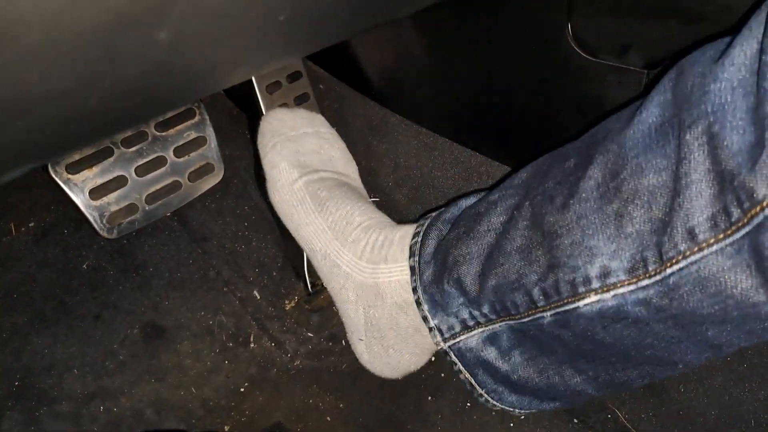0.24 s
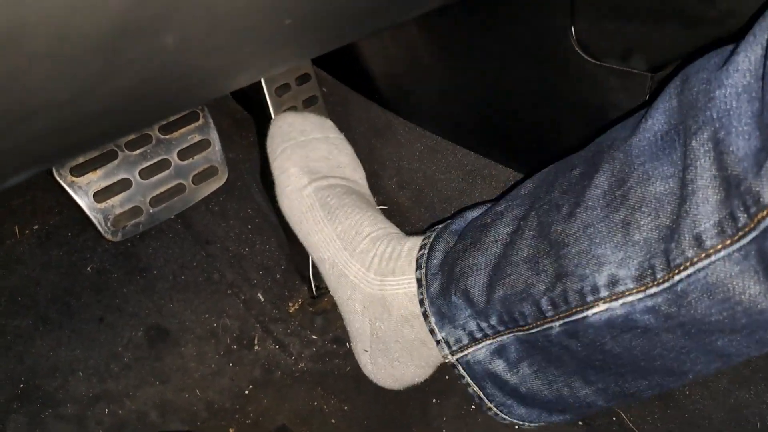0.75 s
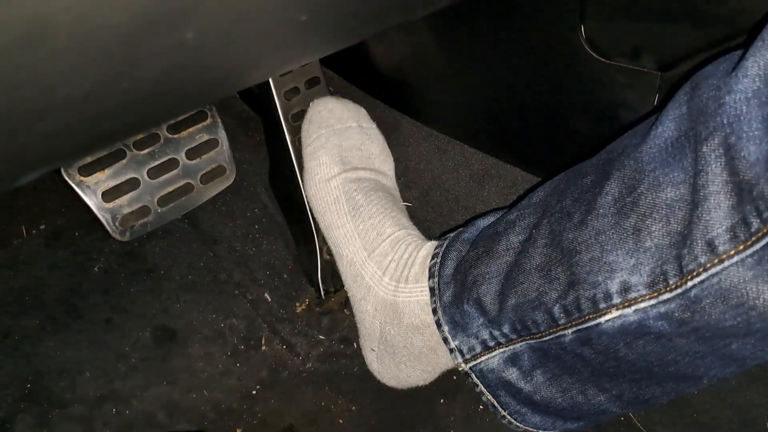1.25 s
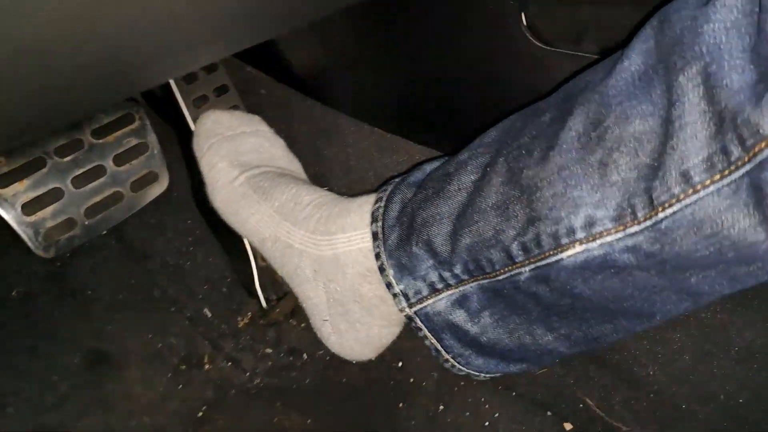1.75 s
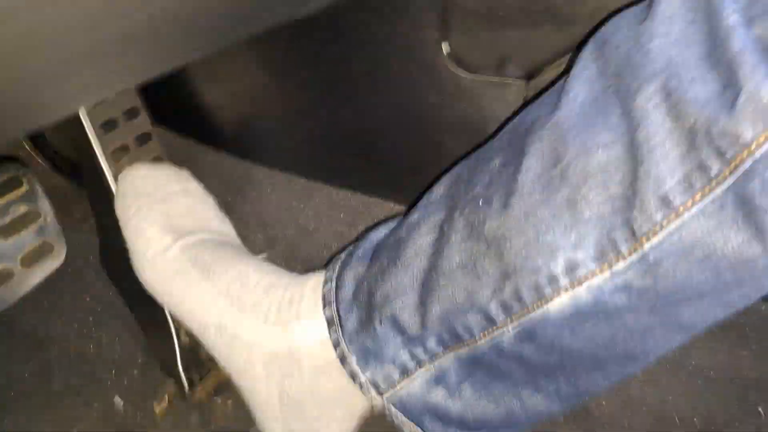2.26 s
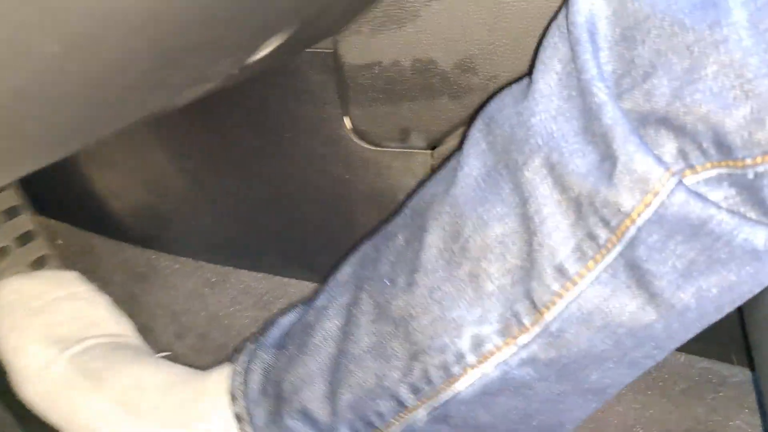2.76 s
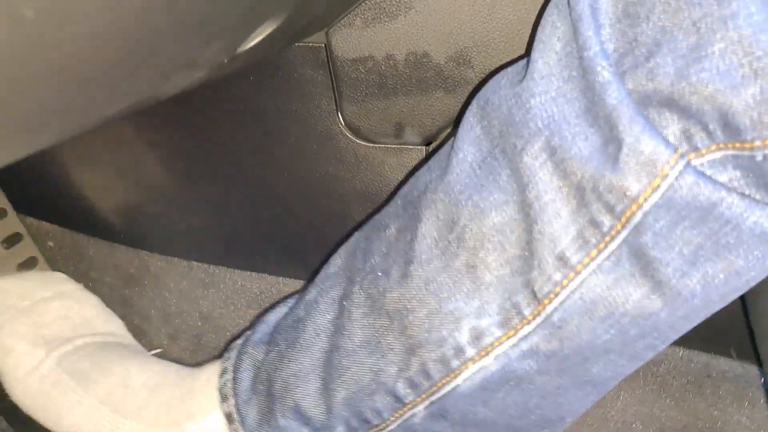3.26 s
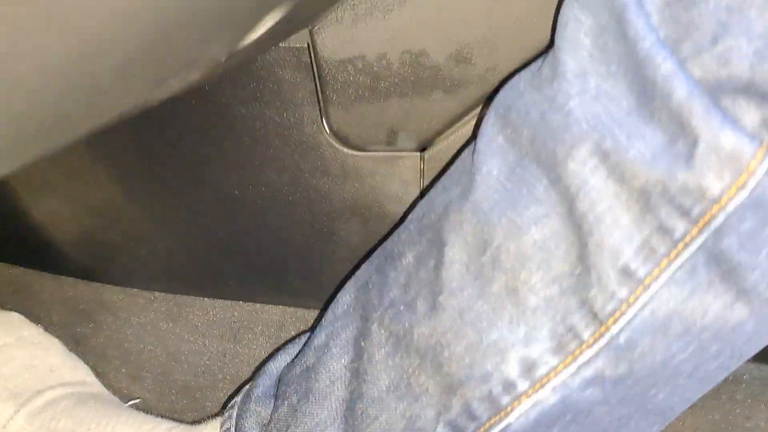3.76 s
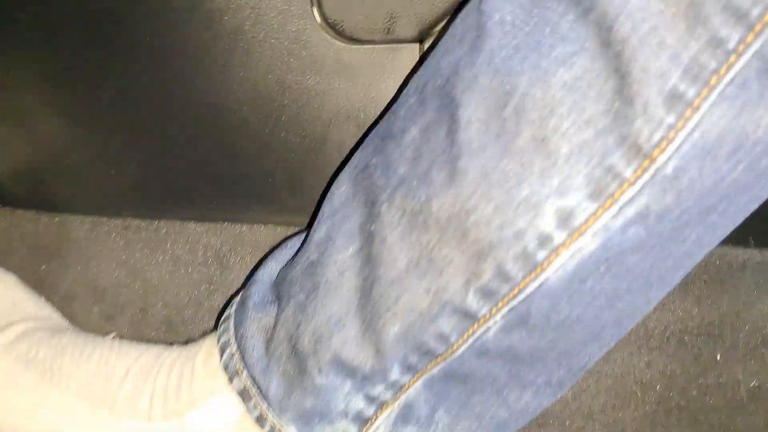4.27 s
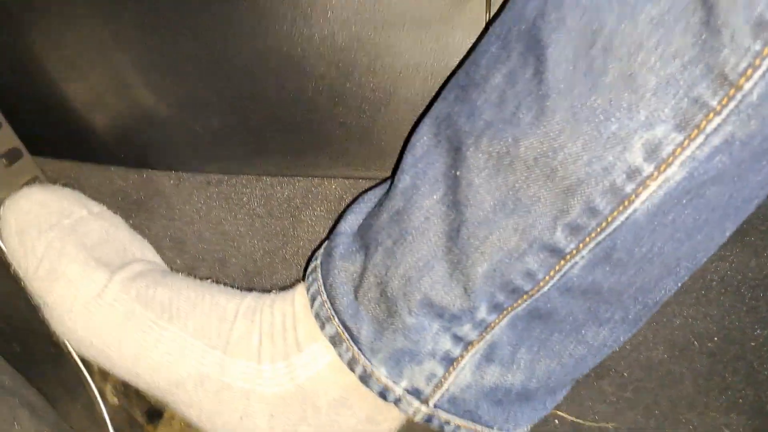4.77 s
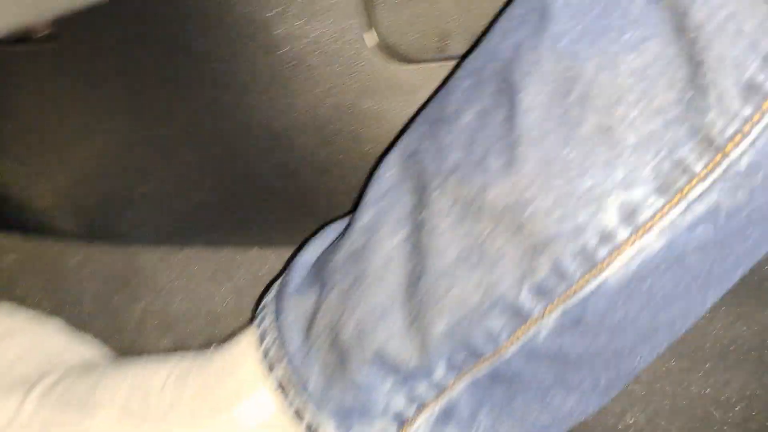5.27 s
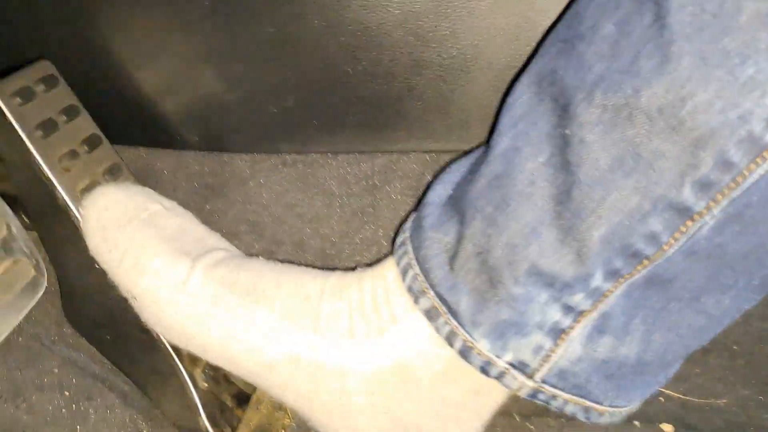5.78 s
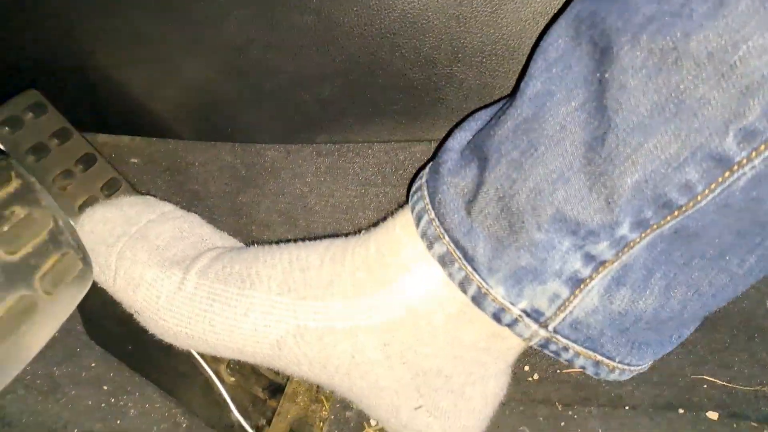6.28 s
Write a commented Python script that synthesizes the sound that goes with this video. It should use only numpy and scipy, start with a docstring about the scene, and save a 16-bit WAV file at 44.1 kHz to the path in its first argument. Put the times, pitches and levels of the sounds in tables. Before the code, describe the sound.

Faint, irregular brushing and a few soft taps come from a foot in a sock working the pedals of a parked car. Handling noise on the nearby hand-held microphone soon adds clicks, scrapes and fabric swishes. The loudest knock lands about halfway, followed by a short stuttering creak, then busier rubbing and more soft thumps. The padded footwell sounds close and dry, booming briefly after each knock.

```python
"""Foot on the pedals of a parked car

A socked foot taps and rubs the pedals and shifts on the floor mat, while cloth and fingers slide past
the two microphones of a hand-held camera. Sliding friction gives broadband noise, and stick-slip one
creak. Impacts on pedals and camera case excite damped modes, heard as ticks and knocks; the closed
cabin booms after each knock and rumbles faintly in between."""
import sys
import numpy as np
from scipy import signal
from scipy.fft import rfft, irfft, next_fast_len
from scipy.io import wavfile
from scipy.ndimage import uniform_filter1d, map_coordinates

SR = 44100
rng = np.random.default_rng(int(sys.argv[2]) if len(sys.argv) > 2 else 0)


def digitize_waveform(pressure):
    """Quantize a signal to 16-bit integers and store it at the path in sys.argv[1].

    Rows of a 2-D input are taken as channels; values are limited to [-1, 1].
    """
    field = np.atleast_2d(pressure).T
    bounded = np.clip(field, -1, 1)
    quanta = np.round(bounded * 32767).astype(np.int16)
    wavfile.write(sys.argv[1], SR, quanta)


N = 288369


def amp(db):
    return 10 ** (np.asarray(db) / 20)


def unit_rms(x):
    return x / np.sqrt(np.mean(x ** 2) + 1e-20)


def along(points, hz):
    """Interpolation of (frequency_hz, value) points on a logarithmic frequency axis."""
    frequencies, values = np.transpose(points)
    return np.interp(np.log(hz + 1), np.log(frequencies + 1), values)


def wobble(rate_hz):
    """Slow random modulation: a spline through Gaussian values drawn at rate_hz."""
    knots = rng.standard_normal(int(N * rate_hz / SR) + 4)
    return map_coordinates(knots, [np.arange(N) * rate_hz / SR])


def filtered(x, response):
    """Linear filtering: the spectrum is multiplied by a frequency response."""
    size = next_fast_len(N + 8192)
    return irfft(rfft(x, size) * response(np.fft.rfftfreq(size, 1 / SR)), size)[..., :N]


def minimum_phase(spectrum, hz):
    """Causality: folding the cepstrum gives a response that never precedes the blow."""
    cepstrum = irfft(np.log(amp(along(spectrum, hz))))
    half = len(cepstrum) // 2
    cepstrum[1:half] *= 2
    cepstrum[half + 1:] = 0
    return np.exp(rfft(cepstrum))


def sides(pan_db):
    """Constant-power panning: two gains, the left pan_db above the right."""
    left_share = 1 / (1 + amp(-2 * np.asarray(pan_db)))
    return np.sqrt(2 * np.array([left_share, 1 - left_share]))


def place(out, start_s, sound, pan_db, lag_s_per_db=0.00003):
    """Path difference: the farther microphone receives a sound weaker and later."""
    for channel, gain, weaker_db in zip(out, sides(pan_db), (-pan_db, pan_db)):
        arrival = round((start_s + lag_s_per_db * max(weaker_db, 0)) * SR)
        channel[arrival:][:len(sound)] += gain * sound


def noise(spectrum, correlation=0, grain_db=0, grain_hz=100, patchy_db=0):
    """Modulated stereo noise of rms 1: catching fibres vary its level, shifting folds its colour."""
    common, opposed = rng.standard_normal((2, N + 512))
    angle = np.arccos(correlation) / 2
    pair = np.cos(angle) * common + np.sin(angle) * np.array([opposed, -opposed])
    frames = signal.stft(pair, nperseg=512)[2]
    patches = uniform_filter1d(rng.standard_normal(frames.shape[1:]), size=5, axis=0)
    patches = unit_rms(uniform_filter1d(patches, size=16, axis=1))
    patchy = signal.istft(frames * amp(patchy_db * patches), nperseg=512)[1][:, :N]
    grain = amp(grain_db * np.array([wobble(grain_hz), wobble(grain_hz)]))
    return unit_rms(filtered(patchy * grain, lambda hz: amp(along(spectrum, hz))))


# Sliding strokes: full_at_s, rise_s, hold_s, fall_s, scrape_db, resonance_oct (above 1 kHz),
# body_db (relative to scrape_db), cloth_db, hiss_db, scrape_pan_db, hiss_pan_db
STROKES = [(0.167, 0.066, 0.059, 0.14, -75.5, -0.16, -4, -78.5, -101, 1, 6),
           (0.33, 0.0072, 0, 0.089, -61, -0.6, -4, -80, -100, 1, 3),
           (0.397, 0.13, 0.036, 0.19, -82, -0.34, -8, -83, -98, 4, 7),
           (0.64, 0.075, 0.17, 0.055, -75.5, -0.25, -13, -78.5, -91, 4, 8),
           (0.778, 0.0027, 0.034, 0.024, -55.5, -1.9, 3, -95, -92, 4, -6),
           (1.07, 0.034, 0, 0.092, -73, 0.17, 20.5, -80, -94, -3, 10),
           (1.478, 0.08, 0.16, 0.21, -65, 0.26, -6, -72.5, -98, -1.5, -6),
           (1.579, 0.061, 0.016, 0.044, -63, 0.91, -15, -64, -81, -11, 5),
           (1.638, 0.093, 0.006, 0.089, -58, -0.31, 1, -69, -76, -11, 3),
           (1.804, 0.12, 0.45, 0.45, -68, 0.13, 6, -64.5, -74, -2, -6),
           (1.821, 0.024, 0.127, 0.054, -48, -1.6, -6, -67, -81, -2.5, -10),
           (1.939, 0.005, 0.064, 0.086, -36.5, -0.56, -17, -56.5, -64.5, -8.5, -3),
           (2.019, 0.042, 0.055, 0.035, -44.5, 0.8, 1, -50.5, -57, -0.5, -6),
           (2.134, 0.041, 0.031, 0.12, -42.5, -0.33, 0.5, -59, -66.5, -4.5, -10.5),
           (2.268, 0.006, 0.06, 0.018, -47, 0, 4, -46, -52, -5, -18.5),
           (2.333, 0.041, 0.033, 0.073, -48.5, -0.057, -4, -62, -67, -5, -14),
           (2.354, 0.027, 0.052, 0.011, -61.5, 1.5, 1, -59.5, -61.5, 7, -3.5),
           (2.619, 0.16, 0.017, 0.012, -51.5, 0.74, -11, -54, -56.5, -5, -5.5),
           (2.635, 0.22, 0.086, 0.027, -49.5, 1.1, -8, -59, -67, -2, -8),
           (2.708, 0.0031, 0.0053, 0.0069, -36, 0.96, -12, -40.5, -58, 0, -9.5),
           (2.75, 0.037, 0.04, 0.22, -65, 0.1, -1.5, -73, -82, 3, 1),
           (2.92, 0.14, 0.0055, 0.35, -93, 0, 6, -74.5, -83, -6, 2.5),
           (3.127, .04, 0.22, .2, -83, 0.58, -4, -75, -100, 2.5, -3),
           (3.29, 0.27, 0.052, 0.25, -71.5, 0.16, -8, -77, -80, -3, -6),
           (3.523, 0.23, 0.064, 0.14, -57.5, -0.081, 3, -62, -113, 5, -9),
           (3.622, 0.0021, 0.04, 0.002, -27, 0.68, -9, -38, -54, 14, 23),
           (3.695, 0.007, 0.022, 0.0086, -53, 0.26, 4, -49, -61, 10, -29),
           (3.758, 0.21, 0.3, 0.38, -52, 2, 7.5, -57, -63.5, 0.5, -11.5),
           (4.011, 0.27, 0.25, 0.37, -56.5, 0.13, 7, -44.5, -47, 0, -18),
           (4.513, 0.3, 0.055, 0.1, -42, -0.11, -10.5, -55.5, -60.5, -7.5, -15.5),
           (4.686, 0.088, 0, 0.047, -53, 1.1, -17, -66.5, -94, -12, 2),
           (4.706, 0.0084, 0.037, 0.028, -44, -0.54, -28.5, -73, -95, -14, 19),
           (4.888, 0.13, 0.038, 0.3, -54.5, 2.15, -4, -61.5, -89, -20, -2),
           (5.182, 0.045, 0, 0.34, -55.5, 0.64, -11, -57, -79, -32, -20),
           (5.267, 0.13, 0.22, 0.34, -54, -0.31, 8, -51, -53, -3.5, -17),
           (5.624, 0.034, 0.026, 0.037, -43.5, -0.66, -1, -51.5, -61.5, -7.5, -5),
           (5.675, 0.028, 0.043, 0.01, -52, 0.7, -8, -49.5, -56, -7, -5),
           (5.741, 0.066, 0, 0.14, -50.5, 0.82, 0.5, -55, -63, -3.5, -1),
           (5.862, 0.026, 0.039, 0.14, -42.5, 1.3, 0.5, -42.5, -50.5, -1, 2),
           (5.941, 0.072, 0.19, 0.051, -41.5, 0.21, -10, -56, -64.5, 1.5, -15),
           (6.078, 0.13, 0, 0.036, -36, 0.9, -7, -40.5, -51.5, -1, 3),
           (6.118, .05, 0.053, 0.23, -60, 0.83, 3, -56.5, -66, -13, -3),
           (6.3, 0.0028, 0.026, 0.0052, -40.5, 0.53, -1, -58, -65, 15.5, 0),
           (6.344, 0.032, 0.3, 0.16, -45, -0.26, -0.5, -56.5, -64, -6, -5),
           (6.47, 0.048, 0.061, 0.037, -36, -0.58, 1, -54.5, -66, -5, -12)]

def stroke_envelope(level_db, steepness, pan_db=0):
    """Incoherent addition: strokes sum in power. Each rise_s or fall_s spans 20 dB times steepness."""
    full_at_s, rise_s, hold_s, fall_s = np.transpose(STROKES)[:4, :, None]
    t = np.arange(0, N + 44, 44) / SR  # about one point a millisecond
    away = np.maximum(full_at_s - t, 0) / rise_s + np.maximum(t - full_at_s - hold_s, 0) / fall_s
    edge_db = -20 * steepness * away ** 1.126  # rounded top, steep feet
    gains = amp(level_db) * sides(pan_db + np.zeros_like(level_db))
    power = gains ** 2 @ amp(2 * edge_db)
    return np.sqrt([np.interp(np.arange(N) / SR, t, channel) for channel in power])


# Spectrum of the rumble: frequency_hz, density_db
RUMBLE_SPECTRUM = [(20, -31.5), (35, -2.5), (50, 4), (100, -7), (150, -12.5), (200, -24.5), (400, -58.5)]

def rumble(idle_db=-63.5, lag_s=0.1):
    """Forced vibration: hand and car body rumble, swelling after each scrape's low body up to a limit."""
    scrape_db, _, body_db = np.transpose(STROKES)[4:7]
    drive_db = np.minimum(scrape_db + body_db, -50) - 2
    drive = stroke_envelope(drive_db, steepness=0.74)[0]
    delayed_power = np.pad(drive ** 2, (round(lag_s * SR / 2), 0))
    shaken_power = np.abs(uniform_filter1d(delayed_power, round(lag_s * SR)))[:N]
    envelope = np.sqrt(amp(2 * idle_db) + shaken_power) * amp(1.3 * wobble(6.0))
    return envelope * noise(RUMBLE_SPECTRUM, correlation=0.78)


# Spectrum of coarse friction: frequency_hz, density_db
SCRAPE_SPECTRUM = [(150, 3.5), (240, 2.5), (360, 2), (600, -2), (1000, -2.5), (1500, -4.5), (2500, -6),
                   (3500, -10.5), (6000, -27)]

def scrape(flank_db=-6, width_oct=0.79, slope_db_per_oct=-6):
    """Roughness excitation: friction noise takes on a broad resonance and a low body in each stroke."""
    scrape_db, resonance_oct, body_db, _, _, pan_db, _ = np.transpose(STROKES)[4:]
    centres_oct = np.arange(-2, 2.1, 2 / 3)  # overlapping bands about 1 kHz

    def band_windows(hz):
        octave = np.clip(np.log2(hz / 1000 + 1e-9), -2, 2)
        return np.clip(1 - 1.5 * np.abs(octave - centres_oct[:, None, None]), 0, 1)

    friction = noise(SCRAPE_SPECTRUM, correlation=0.17, grain_db=2.5, grain_hz=250, patchy_db=2.5)
    bands = filtered(friction, band_windows)
    offset_oct = centres_oct[:, None] - resonance_oct
    band_db = flank_db * (1 - np.exp(-(offset_oct / width_oct) ** 2 / 2))
    band_db += slope_db_per_oct * np.maximum(offset_oct - 1, 0)
    band_db[0] = body_db  # the lowest band is the body
    return sum(stroke_envelope(scrape_db + db, steepness=0.84, pan_db=pan_db) * band
               for db, band in zip(band_db, bands))


# Spectra of cloth rubbed firmly and brushed lightly: frequency_hz, density_db
FIRM_SPECTRUM = [(1200, -3.5), (2300, -4), (3000, -5), (4200, -2), (6300, -1.5), (7500, -9.5), (9000, -17),
                 (12000, -44)]
LIGHT_SPECTRUM = [(2000, -39), (3300, -15), (4500, -10), (5400, -4), (6000, -2), (6800, -7), (7600, -16.5),
                  (10000, -18)]

def cloth_rustle():
    """Fibre friction: harder rubbing widens the band of the rustle."""
    cloth_db, _, scrape_pan_db, hiss_pan_db = np.transpose(STROKES)[7:]
    pressure = stroke_envelope(cloth_db, steepness=1, pan_db=0.4 * scrape_pan_db + 0.51 * hiss_pan_db)
    pressure_db = 10 * np.log10(np.mean(pressure ** 2, axis=0) + 1e-14)
    firmness = np.clip((pressure_db + 76) / 20, 0, 1)
    firm = noise(FIRM_SPECTRUM, grain_db=1.8, grain_hz=600, patchy_db=1.8)
    light = noise(LIGHT_SPECTRUM, grain_db=1.5, grain_hz=600, patchy_db=1.5)
    return pressure * (np.sqrt(firmness) * firm + np.sqrt(1 - firmness) * light)


# Spectrum of fine friction: frequency_hz, density_db
HISS_SPECTRUM = [(5000, -18), (8000, -14.5), (9500, -8.5), (12000, 0), (13500, -10), (15500, -9.5),
                 (16500, -37.5)]
# Shelf gain on the top of the hiss: time_s, gain_db
HISS_SHELF = [(1.8, 2), (2.05, -6), (2.2, -3), (2.62, 8), (3.6, -3), (4.1, 6.5), (5.6, 4), (5.87, -5),
              (6.05, 2), (6.3, -4)]

def fine_hiss(shelf_hz=12800):
    """Fine-scale friction: a high band of noise whose top brightens and dulls over time."""
    hiss_db, _, pan_db = np.transpose(STROKES)[8:]
    hiss = noise(HISS_SPECTRUM, grain_db=0.9, grain_hz=490, patchy_db=1.0)
    top = filtered(hiss, lambda hz: np.clip((hz - shelf_hz) / 1000, 0, 1))
    shelf_gain = amp(np.interp(np.arange(N) / SR, *np.transpose(HISS_SHELF)))
    hiss += (shelf_gain - 1) * top
    return stroke_envelope(hiss_db, steepness=1.42, pan_db=pan_db) * hiss


def rubbing():
    """Common amplitude modulation: uneven sliding speed shakes all three friction layers together."""
    flutter = amp(0.8 * wobble(25))
    return flutter * (cloth_rustle() + fine_hiss() + scrape())


# Sharp impacts: start_s, ring_db, pitch_hz, t60_s, crack_db (relative to ring_db, unfiltered), pan_db
TICKS = [(0.3307, -46, 1820, 0.018, -14, 11.5), (0.729, -50.5, 626, 0.015, -17, 16),
         (1.0715, -58, 1020, 0.008, -1.5, 3), (2.166, -33, 3600, 0.0016, -8, -4.5),
         (2.2395, -14.5, 555, 0.0058, -27, -14), (2.2606, -3, 1040, 0.0035, -16.5, -6),
         (2.3578, -19, 940, 0.0057, -7, 4.5), (2.7091, -20.5, 1970, 0.0046, -11.5, 8.5),
         (2.776, -41.5, 1874, 0.0036, -19, 3.5), (3.3251, -49, 924, 0.035, -10.5, -4),
         (3.6223, 14.5, 574, 0.0031, -35.5, 16.5), (3.6295, -15.5, 736, 0.012, -27, 1),
         (3.6405, 4, 1000, 0.0039, -26, -11.5), (3.9209, -15, 1160, 0.0017, -27, -11.5),
         (4.7116, 0.5, 910, 0.0028, -18.5, -26), (5.0472, -31, 1480, 0.0058, -23, -7),
         (5.219, -35.5, 1124, 0.006, -9, -27), (5.446, -21.5, 960, 0.0054, -37, -10.5),
         (5.525, -20.5, 925, 0.0087, -24, -15), (5.532, -29.5, 3220, 0.0033, -9, -6.5),
         (5.9921, -17.5, 1310, 0.003, -17, 14.5), (6.2945, -28.5, 900, 0.01, -18, 13),
         (6.352, -11.5, 2210, 0.0013, -29, -7.5), (6.4595, -5.5, 855, 0.0021, -26, -3.5)]
# Filter that colours the crack: frequency_hz, gain_db
CRACK_RESPONSE = [(800, 4), (2000, 25), (4000, 20.5), (6500, 12), (8500, 5), (12000, 4), (16000, -13.5)]

def ticks():
    """Damped free vibration: a struck stiff part rings briefly, with a noisy crack on the attack."""
    rings, cracks = np.zeros((2, 2, N + SR))
    t = np.arange(SR // 10) / SR
    for start_s, ring_db, pitch_hz, t60_s, crack_db, pan_db in TICKS:
        contact = 1 - np.exp(-2.5 * pitch_hz * t)  # the force builds over part of a cycle
        ring = amp(ring_db - 60 * t / t60_s) * contact * np.sin(2 * np.pi * pitch_hz * t)
        place(rings, start_s, ring, pan_db)
        crack = amp(-60 * t / (0.84 * t60_s)) * rng.standard_normal(len(t))
        crack[0] = 3  # the first touch is the sharpest
        place(cracks, start_s, amp(ring_db + crack_db) * crack / np.linalg.norm(crack), pan_db)
    return rings[:, :N] + filtered(cracks[:, :N], lambda hz: minimum_phase(CRACK_RESPONSE, hz))


# Reverberation time of the cabin: frequency_hz, t60_s
CABIN_DECAY = [(100, 0.47), (1000, 0.026), (8000, 0.0089)]

def cabin_echo(source, delay_samples=130):
    """Reverberation: the padded footwell absorbs high frequencies fastest."""
    hz, t, frames = signal.stft(rng.standard_normal((2, SR // 4)), SR, nperseg=256)
    decay = amp(-60 * t / along(CABIN_DECAY, hz)[:, None])
    tail = signal.istft(frames * decay, SR, nperseg=256)[1]
    delayed = np.pad(source, (delay_samples, 0))[None]
    return signal.fftconvolve(delayed, tail / np.linalg.norm(tail[0]), axes=1)[:, :N]


# Dull impacts: start_s, knock_db, knock_hz, boom_db, boom_hz, boom_t60_s, pan_db
KNOCKS = [(0.728, -48.5, 218, -43, 84.2, 0.5, 3.5), (0.786, -46.5, 310, -19.5, 93, 0.051, -4),
          (0.887, -80, 250, -26.5, 72, 0.052, 2), (1.075, -46.5, 174, -26, 81, 0.084, 6),
          (2.076, -35.5, 180, -34, 110, 0.12, 1), (2.239, -28.5, 370, -24.5, 87, 0.16, -51),
          (2.263, -25, 327, -25, 70.5, 0.11, -6), (2.355, -28, 218, -10.5, 105, 0.036, -7),
          (2.573, -74, 230, -24, 61, 0.11, -21), (2.631, -46, 175, -17.5, 61, 0.11, -19),
          (2.707, -41, 250, -23.5, 85, 0.077, 4), (3.475, -41, 170, -27, 75, 0.12, 7),
          (3.622, -6.5, 196, -3.5, 98, 0.098, 36), (3.643, -42, 186, 4, 72, 0.057, 31),
          (3.644, -16.5, 186, -14.5, 67.4, 0.31, 27), (4.08, -24, 254, -29, 87, 0.17, -7),
          (4.536, -47, 292, -26, 74, 0.12, -1), (4.585, -38, 253, -33.5, 80, 0.15, -14),
          (4.901, -56.5, 254, -32, 80.3, 0.09, 7), (5.047, -33.5, 252, -27.5, 90, 0.13, -5),
          (5.194, -26.5, 260, -16, 87.3, 0.11, -8), (5.308, -26.5, 256, -23, 87, 0.13, -7),
          (5.524, -31.5, 260, -34.5, 85, 0.22, -12), (5.689, -30, 225, -40, 65.8, 0.067, -5),
          (5.697, -43, 218, -6, 65.5, 0.048, -14), (5.989, -23.5, 248, -7, 91, 0.081, -6.5),
          (6.063, -29.5, 260, -9.5, 78, 0.077, -5), (6.297, -34.5, 377, -33, 81, 0.34, -22),
          (6.519, -25.5, 224, -46, 109, 0.18, -14)]

def knocks(knock_t60_s=0.041, puff_t60_s=0.07):
    """Cavity resonance: after a hollow knock and its puff of noise, floor and cabin air boom."""
    out = np.zeros((2, N + SR))
    t = np.arange(SR // 2) / SR
    dull_band = signal.butter(2, [140, 750], "bandpass", fs=SR, output="sos")
    soft_contact = 1 - np.exp(-t / 0.00041)
    swell = (1 - np.exp(-t / 0.011)) ** 2
    for start_s, knock_db, knock_hz, boom_db, boom_hz, boom_t60_s, pan_db in KNOCKS:
        modes = np.sin(2 * np.pi * knock_hz * t) + 0.077 * np.sin(2 * np.pi * 1.7 * knock_hz * t)
        puff = unit_rms(signal.sosfilt(dull_band, rng.standard_normal(len(t))))
        knock = amp(-60 * t / knock_t60_s) * modes + amp(-19 - 60 * t / puff_t60_s) * puff
        boom = swell * amp(-60 * t / boom_t60_s) * np.sin(2 * np.pi * boom_hz * t + 3)
        place(out, start_s, -amp(knock_db) * soft_contact * knock, pan_db)
        place(out, start_s, amp(boom_db) * boom, 0.41 * pan_db)  # nearer the centre
    return out[:, :N]


# Slips of a joint: start_s, level_db, bright_db (extra gain of the upper modes)
SLIPS = [(4.254, -32.5, -19.5), (4.279, -24.5, -3), (4.308, -24.5, 0.5), (4.3402, -25, 2.5),
         (4.374, -22.5, -4.5), (4.4095, -26, 7.5)]
# Modes of the joint, lowest first: pitch_hz, level_db, t60_s
JOINT_MODES = [(252, 7, 0.014), (790, -13, 0.013), (1250, -7.5, 0.0093)]

def creak():
    """Stick-slip friction: each slip of a loaded joint is a bright flick and a dull swing back."""
    out = np.zeros((2, N + SR))
    t = np.arange(SR // 10) / SR
    low, *bright = [amp(level_db - 60 * t / t60_s) * np.sin(2 * np.pi * pitch_hz * t)
                    for pitch_hz, level_db, t60_s in JOINT_MODES]
    swing = low * (1 - np.exp(-t / 0.0019))
    for start_s, level_db, bright_db in SLIPS:
        place(out, start_s, amp(level_db) * (amp(bright_db) * sum(bright) - swing), pan_db=-7)
    return out[:, :N]


def scene():
    """Superposition: impacts, the echo of the ticks, friction and rumble add linearly."""
    ticking = ticks()
    echo = amp(-25) * cabin_echo(ticking.mean(axis=0))
    return ticking + echo + knocks() + creak() + rubbing() + rumble()


# Spectrum of the microphones' own noise: frequency_hz, density_db
SELF_NOISE_SPECTRUM = [(150, -42.5), (250, 2), (1260, -12.5), (1500, -10.5), (2050, -10), (3280, -12),
                       (7440, -21.5), (11900, -13.5), (16000, -18)]

def record(dry, bass_cut_hz=36, top_hz=16150):
    """Transduction: the microphones add self-noise, cut the bass, saturate softly and limit the band."""
    noisy = dry + amp(-79.0) * noise(SELF_NOISE_SPECTRUM)
    high_passed = filtered(noisy, lambda hz: (1 + (bass_cut_hz / (hz + 1)) ** 8) ** -0.5)
    saturated = high_passed / (1 + np.abs(high_passed / 0.98) ** 8) ** (1 / 8)
    return filtered(saturated, lambda hz: hz < top_hz)


dry = scene()
out = record(dry)
digitize_waveform(out)
```